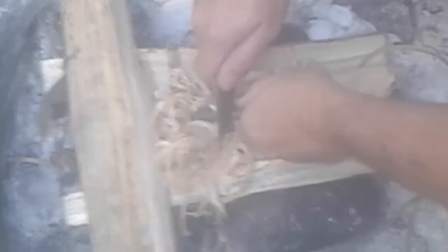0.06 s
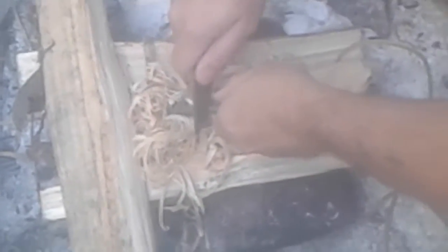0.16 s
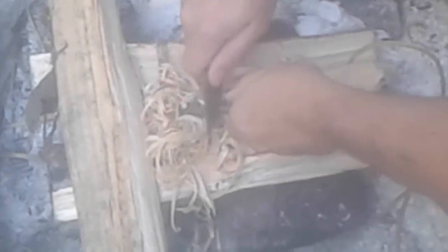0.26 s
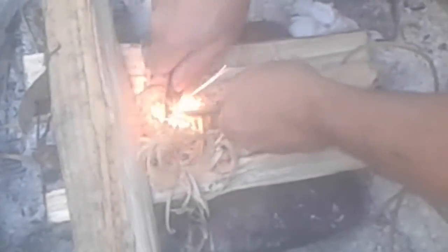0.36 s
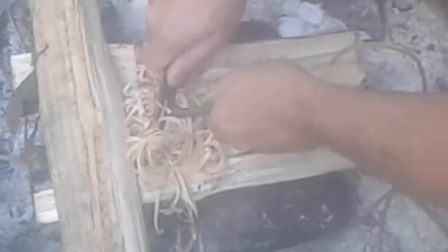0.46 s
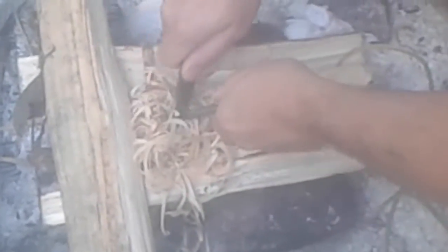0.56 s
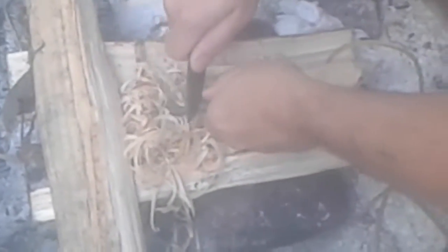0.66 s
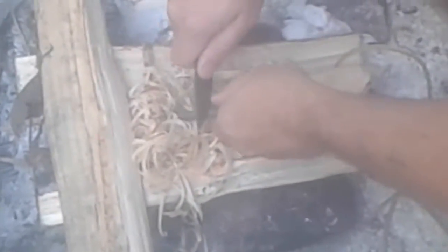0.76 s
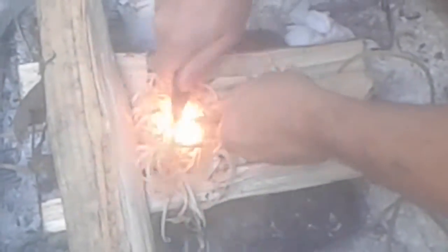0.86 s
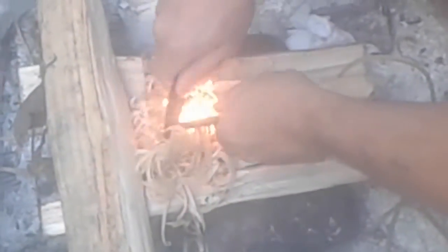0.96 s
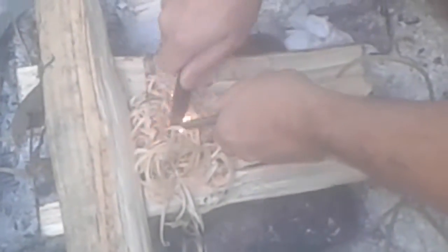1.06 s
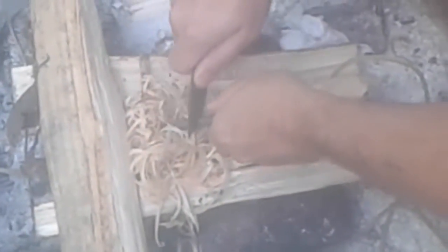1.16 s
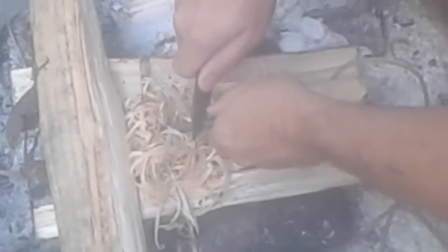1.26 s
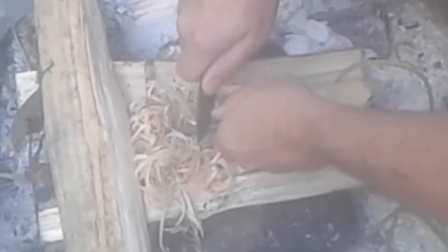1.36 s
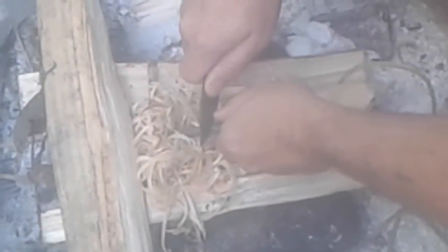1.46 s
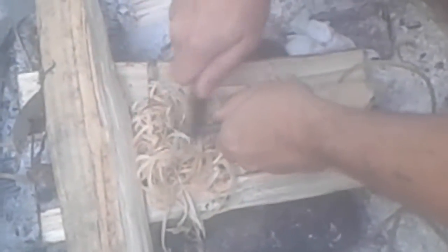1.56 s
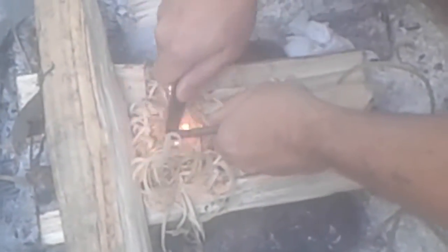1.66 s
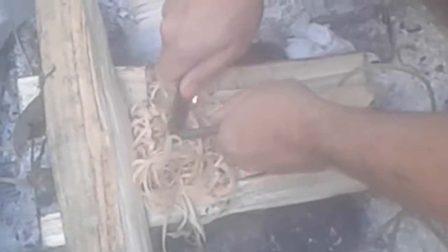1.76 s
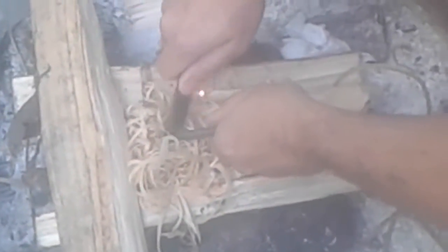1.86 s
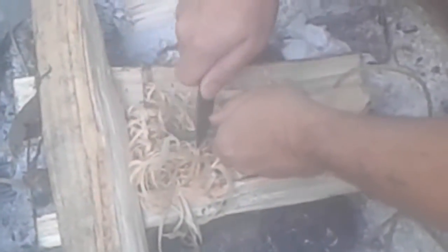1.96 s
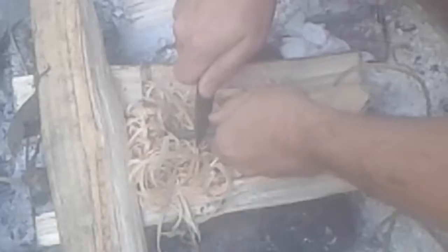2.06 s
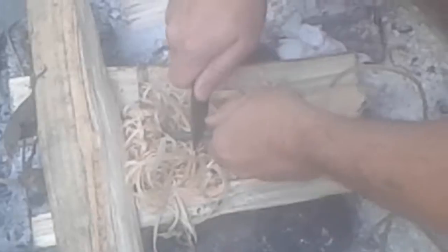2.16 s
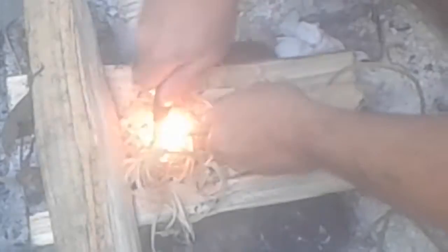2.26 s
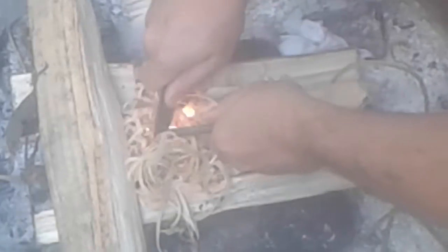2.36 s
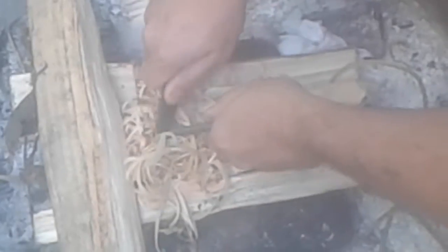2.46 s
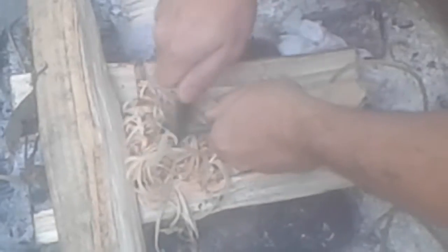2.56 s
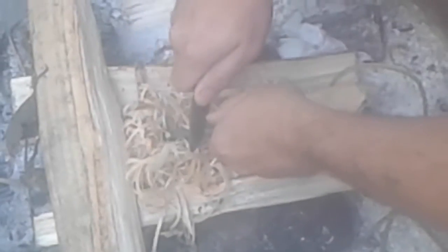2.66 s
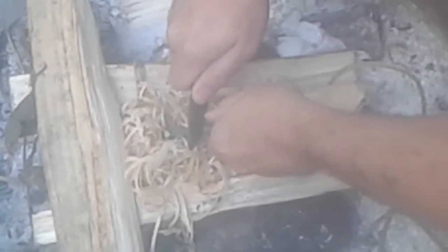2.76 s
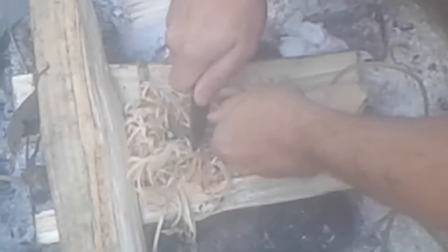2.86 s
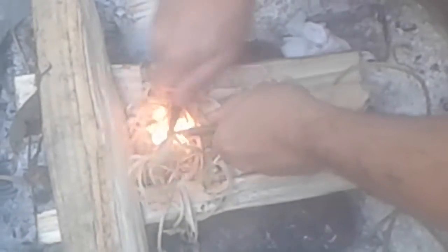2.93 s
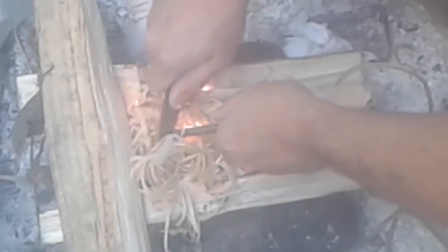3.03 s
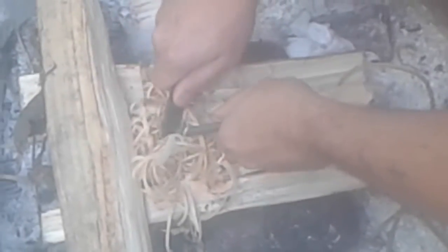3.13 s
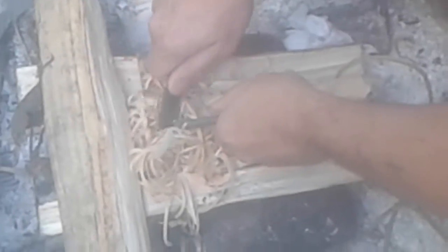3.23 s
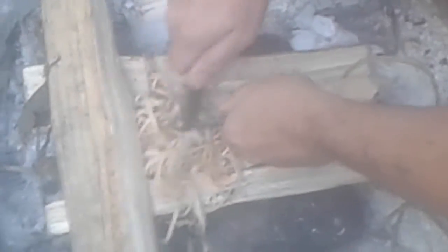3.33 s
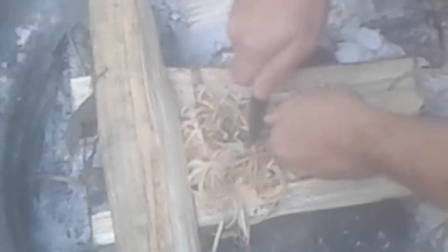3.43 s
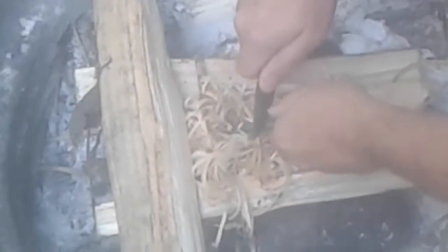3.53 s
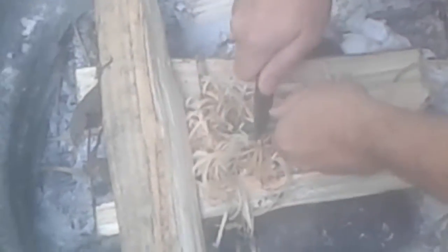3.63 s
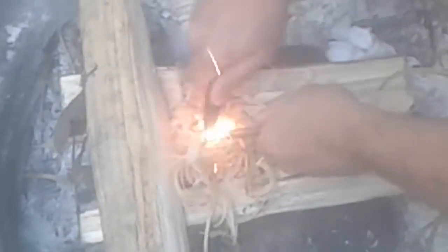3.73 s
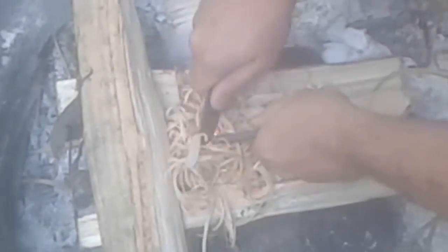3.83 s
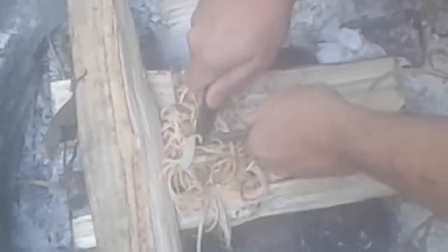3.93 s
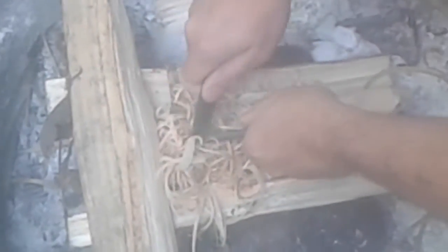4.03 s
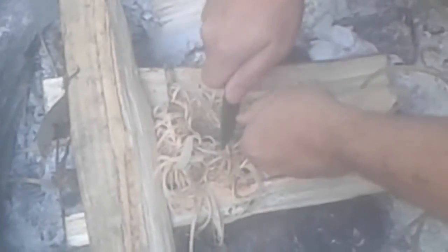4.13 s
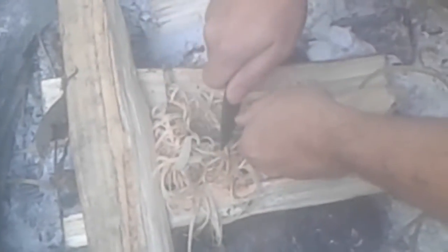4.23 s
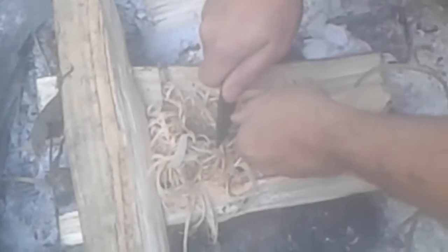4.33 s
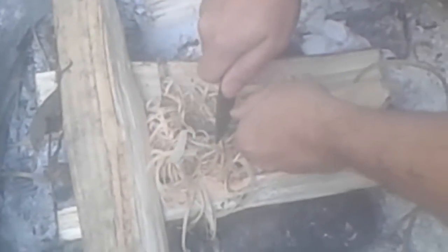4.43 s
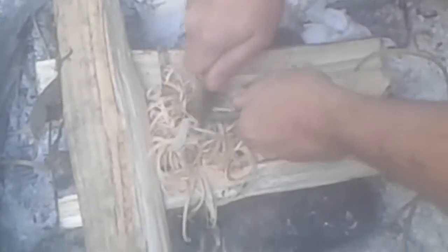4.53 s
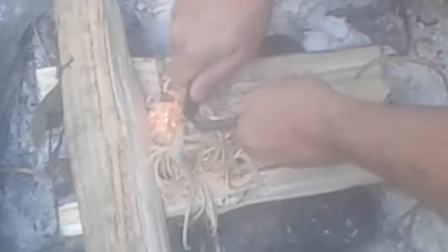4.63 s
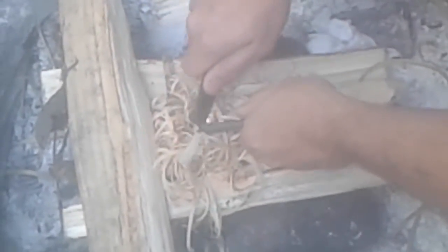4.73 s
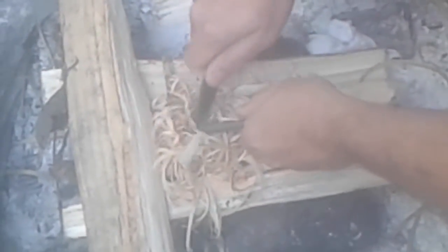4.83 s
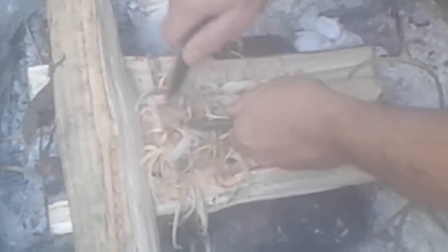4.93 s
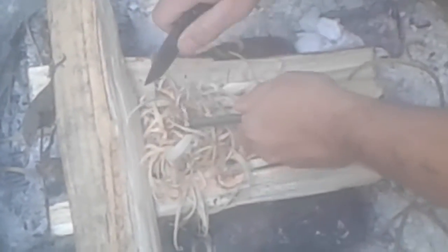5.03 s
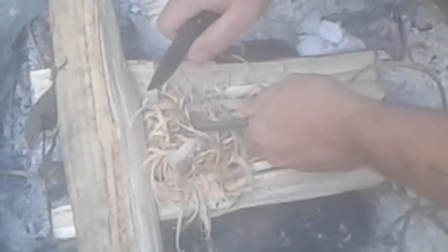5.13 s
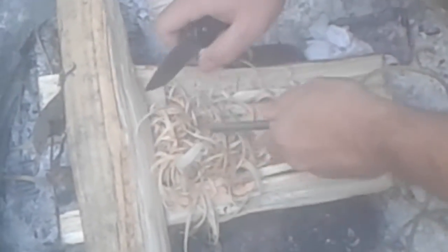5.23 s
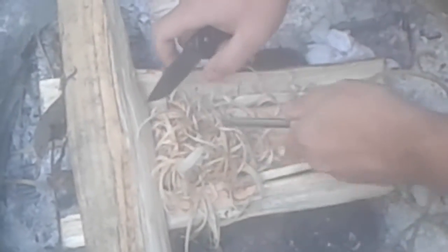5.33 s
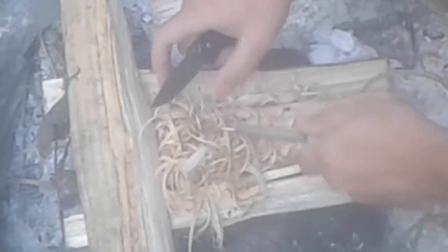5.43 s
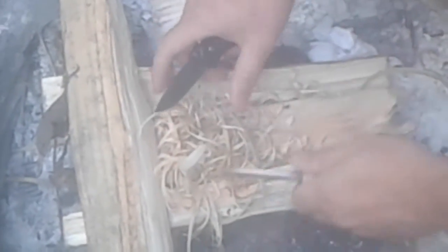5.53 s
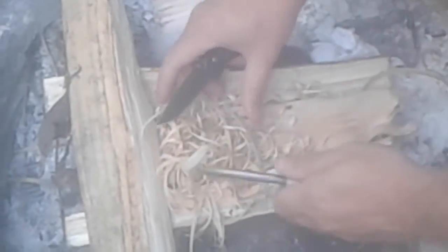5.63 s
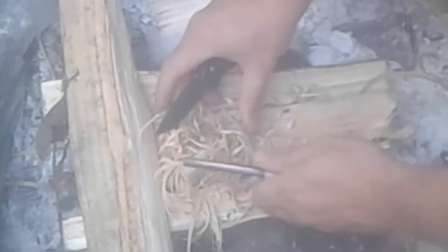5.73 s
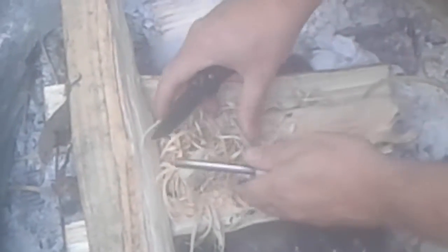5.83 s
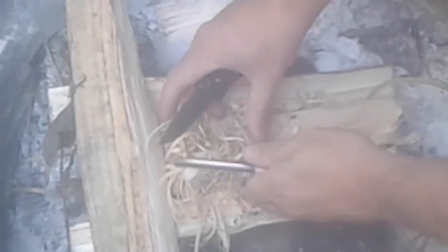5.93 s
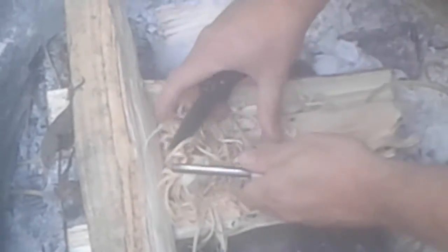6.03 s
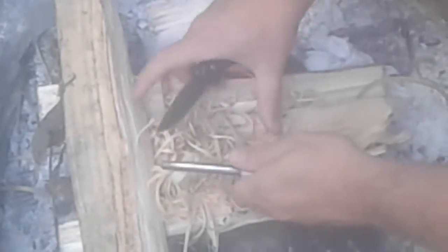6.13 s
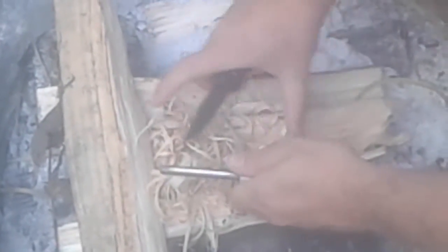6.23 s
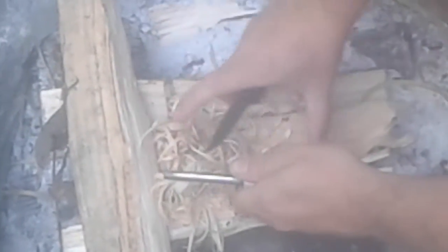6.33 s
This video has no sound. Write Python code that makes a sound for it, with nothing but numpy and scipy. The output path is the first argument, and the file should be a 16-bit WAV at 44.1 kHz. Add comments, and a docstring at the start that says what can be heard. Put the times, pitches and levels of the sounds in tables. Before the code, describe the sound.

Outdoors, a low breeze, a soft hiss and a faint rustle of wood shavings lead into a tick of steel on a ferro rod. A knife then scrapes down the rod seven times, close to the microphone. Each short stroke rasps and catches with a metallic ring, followed by sparks that hiss and pop. Between strokes the blade ticks back into place. The ending is just faint rustle and breeze.

```python
"""A low breeze, a soft hiss and rustling wood shavings are heard first, then a tick of steel on a rod.
A knife is driven down this ferro rod seven times, outdoors. Stick-slip friction sets blade and rod
ringing, and each stroke rasps, chatters and catches; the metal it tears off burns in sparks that
hiss and pop. Between strokes the blade is set back with a tick and slides into place."""
import sys
import numpy as np
from scipy import signal
from scipy.fft import rfft, irfft
from scipy.io import wavfile
from scipy.ndimage import map_coordinates

SR = 44100
rng = np.random.default_rng(int(sys.argv[2]) if len(sys.argv) > 2 else 0)


def persist_wave(psi):
    """Save psi, clipped to +-1, as 16-bit WAV."""
    counts = np.round(np.clip(psi, -1, 1) * 32767).astype(np.int16)
    wavfile.write(sys.argv[1], SR, np.atleast_2d(counts).T)


N = 281740

# Strength of the breeze: (time [s], relative level [dB])
BREEZE_LEVELS = [(0.0, -44.5), (0.07, -52), (0.59, -57.5), (0.62, -60.5), (2.67, -60.5), (2.74, -55.5),
                 (4.07, -61), (5.21, -59), (5.85, -65.5), (6.39, -59.5)]
# Spectra of the four noise sources: (frequency [Hz], relative spectral level [dB])
WIND_SPECTRUM = [(15, -29), (25, -16), (32, -22.5), (69, 0.5), (87, 1), (118, 1), (209, -10), (340, -15.5),
                 (400, -13), (520, -26), (880, -120)]
AIR_SPECTRUM = [(120, -22.5), (200, -5), (277, -4.5), (332, -7.5), (485, -6), (818, -4.5), (1170, -12),
                (1260, -10.5), (1810, -12.5), (3940, -10.5), (4310, -7.5), (5260, -11), (7280, -20),
                (14000, -25.5), (15000, -36)]
SHAVINGS_SPECTRUM = [(120, -16), (200, -4.5), (231, -7), (602, -6.5), (818, -1.5), (1170, -10), (1380, -5),
                     (1460, -15), (2420, -1.5), (3010, -10), (4470, -5), (13500, -27), (15000, -27)]
SPARK_SPECTRUM = [(120, -38.5), (200, -11), (467, -11), (761, -6), (1690, -14), (2460, 0), (3350, -11.5),
                  (4240, -2), (4550, 3), (5660, -7.5), (6190, -8), (6770, -11), (8410, -11), (14000, -19.5),
                  (15000, -32)]
# Likeness of the left and right channels: (frequency [Hz], correlation [-])
WIND_CORRELATION = [(30, 0.05), (70, 0.66), (150, 0.73), (400, 0.39)]
AIR_CORRELATION = [(60, 0.9), (200, 0.99), (700, 0.36), (1500, 0), (3000, 0.023), (12000, 0)]
SPARK_CORRELATION = [(300, 0.78), (800, 0.7), (2400, 0), (4500, 0), (12000, 0.017)]
# Hands brushing the shavings: (start [s], relative level [dB], duration [s])
HAND_BRUSHES = [(-.2, -54, 0.64), (.485, -51.5, 0.063), (.93, -53, 0.18), (1.535, -47.5, 0.11),
                (2.92, -48.5, 0.29), (3.752, -50, 0.18), (5.36, -54, 0.094)]
# Bursts of the prominent sparks: (time [s], level [dB])
SPARK_POPS = [(.924, -42.5), (1.473, -34), (1.539, -30), (2.162, -36), (2.211, -35.5), (2.802, -29),
              (2.83, -50), (2.953, -43), (3.666, -47.5), (3.759, -39.5), (4.279, -35.5), (5.135, -34),
              (5.187, -39)]
# Resonant peaks that colour the metallic scrapes and ticks: (frequency [Hz], bandwidth [Hz],
# scraped level [dB], struck level [dB], left minus right level [dB], left phase lead [rad])
RESONANT_PEAKS = [(466, 730, -22.5, -21.5, 8, 0), (737, 317, -9, -15.5, 1, 0.85),
                  (1067, 79, -8, -7, 2, -0.4), (1226, 170, -12, -25, -8, 2.5),
                  (2027, 153, -14, -33, -24, 3), (2030, 190, -36, -6, 10.5, 1),
                  (2250, 274, -2.5, -4, 5.5, 1), (2417, 280, -1.5, -6.5, 5, 0.84),
                  (2800, 360, -16.5, -14.5, 3, -2.5), (3280, 420, -10, -11, -8, -2.5),
                  (3640, 660, -25.5, -10, 3, -3), (4010, 420, -13, -5, -12, -2.0),
                  (4500, 480, -11, -3, -2, -3), (4700, 1300, -13.5, -26, -8, -2),
                  (5340, 610, -8.5, -13.5, -14, -1), (6020, 400, -12.5, -13.5, -17, -2.6),
                  (6200, 1400, -15, -26, -16, -5.5), (7100, 390, -20, -15.5, 10.5, 1.5),
                  (8380, 1080, -8, -14, 1, 4), (9730, 940, -24, -28.5, -23, 0.9),
                  (11200, 1800, -23, -32, -7, 0.95), (13900, 560, -16.5, -23, -1, 4.5)]
# The blade touches the rod with a tick and slides; mostly it is set back, in the last row it slides off: (time
# [s], tick level [dB], tilt [dB/octave], # favoured frequency [Hz], its lift [dB], relative slide level [dB],
# slide duration [s])
BLADE_TOUCHES = [(0.4638, -27.5, 2, 3020, 10.5, -58, 0.073), (1.1428, -25.5, -3.5, 2115, 4.5, -54, 0.043),
                 (1.6663, -36, -1.5, 2170, 6, -53.5, 0.056), (2.279, -49, 5, 2400, 4, -51, 0.035),
                 (2.4677, -24.5, -1.5, 2200, 3.5, -52, 0.011),
                 (3.11, -29.5, -2.5, 2300, 4.5, -50.5, 0.057), (3.891, -30, -4, 2310, 6, -50.5, 0.088),
                 (4.6355, -25, 0, 2250, 2.5, -65, 0.075), (5.221, -44, -3, 2394, 6, -42.5, 0.041)]
# The edge catches in the rod: (time [s], level [dB], blade resonance lift [dB])
EDGE_CATCHES = [(.8145, -28, 4), (1.333, -30, -4), (2.1, -18.5, 8), (2.758, -27, 2), (3.466, -24.5, 5),
                (4.2222, -19.5, 11.5), (4.2975, -35, 3), (5.2425, -48, 7)]
# Strokes down the rod: (start [s], time of top speed [s], start level [dB], level at top speed [dB],
# blade resonance lift [dB], chatter level [dB], spark hiss level [dB])
KNIFE_STROKES = [(0.775, 0.833, -43.5, -33, -9, -38.5, -31.5), (1.324, 1.379, -34, -32.5, -3.5, -71, -28.5),
                 (2.041, 2.101, -41.5, -26.5, -1.5, -44, -30),
                 (2.721, 2.782, -36, -28.5, 1.5, -47.5, -31.5),
                 (3.407, 3.461, -42.5, -25.5, -1.5, -38, -36.5), (4.169, 4.222, -37, -27, -1.5, -45, -32),
                 (5.001, 5.069, -41.5, -28, -1.5, -42, -33.5)]

TIME = np.arange(N) / SR
GRID_HZ = np.maximum(np.arange(2 ** 12 + 1) * SR / 2 ** 13, 1)
BLADE_HZ, BLADE_WIDTH_HZ = 2160, 330   # bending resonance of the blade, which a looser grip lets ring


def from_db(db):
    """Amplitude grows tenfold for every 20 dB."""
    return 10 ** (np.asarray(db) / 20)


def unit_rms(x):
    """Normalisation to unit mean power."""
    return x / np.sqrt(np.mean(x ** 2) + 1e-20)


def on_grid(points):
    """Interpolation of a table along logarithmic frequency."""
    hz, value = np.transpose(points)
    return np.interp(np.log(GRID_HZ), np.log(hz), value)


def minimum_phase(gain):
    """Folding the cepstrum gives the causal impulse response with this gain."""
    cepstrum = irfft(np.log(gain + 1e-7))
    cepstrum[1:len(gain) - 1] *= 2
    cepstrum[len(gain):] = 0
    return irfft(np.exp(rfft(cepstrum)))


def through(x, response):
    """Convolution with a stereo impulse response scaled to unit mean energy per channel."""
    response = response / np.sqrt(np.sum(response ** 2) / 2)
    return signal.fftconvolve(np.atleast_2d(x), response, axes=-1)[:, :N]


def add(out, start_s, sound):
    """Superposition of a stereo sound on the mix."""
    at = max(int(start_s * SR), 0)
    out[:, at:at + sound.shape[1]] += sound[:, :N - at]


def drift(rate):
    """Random modulation of unit rms, interpolated between `rate` values a second."""
    knots = np.random.default_rng(rng.integers(2 ** 30)).standard_normal(int(TIME[-1] * rate) + 2)
    return unit_rms(np.interp(TIME * rate, np.arange(len(knots)), knots))


def noise(spectrum, correlation):
    """Coloured stereo noise: the balance of mid and side power sets its correlation."""
    gain, alike = from_db(on_grid(spectrum)), np.clip(on_grid(correlation), -.98, .98)
    responses = np.array([minimum_phase(gain * np.sqrt(1 + sign * alike)) for sign in (1, -1)])
    mid, side = through(rng.standard_normal((2, N)), responses)
    return unit_rms(np.array([mid + side, mid - side]))


def grains(per_s, spread_db):
    """Shot noise: tiny fractures of uneven size occur at random moments."""
    sizes = from_db(spread_db * np.minimum(rng.exponential(1, N), 4)) * rng.choice([-1, 1], N)
    return unit_rms(sizes * (rng.random(N) < per_s / SR))


def swells(rows):
    """Envelope with a half sine of power for each (start [s], level [dB], duration [s])."""
    out = np.zeros(N)
    for start, db, length in rows:
        inside = (TIME > start) & (TIME < start + length)
        out[inside] += from_db(db) * np.sqrt(2 * np.sin(np.pi * (TIME[inside] - start) / length))
    return out


def breeze(lift_db=2.04, gust_db=2.37):
    """Turbulent pressure on the microphone makes an uneven rumble."""
    gust = from_db(np.interp(TIME, *np.transpose(BREEZE_LEVELS)) + lift_db + gust_db * drift(25))
    return gust * noise(WIND_SPECTRUM, WIND_CORRELATION) * from_db([[1.1], [-1.1]])


def air(level_db=-55.5):
    """Stationary broadband noise is heard as a soft outdoor hiss."""
    return from_db(level_db) * noise(AIR_SPECTRUM, AIR_CORRELATION) * from_db([[0.3], [-0.3]])


def shavings():
    """Friction under the hands makes dry wood curls rustle."""
    flicker = from_db(1.2 * drift(70) - 3.0)
    return swells(HAND_BRUSHES) * flicker * noise(SHAVINGS_SPECTRUM, AIR_CORRELATION)


def stray_sparks(count=7, earliest_s=.043, latest_s=.17, offset_db=-7, fade_db_per_s=73):
    """Small sparks burst after a random flight, the later the weaker: (time [s], level [dB])."""
    rows = []
    for _, fastest, *_, shower_db in KNIFE_STROKES:
        flight = earliest_s + (latest_s - earliest_s) * rng.random(count)
        db = shower_db + offset_db - fade_db_per_s * flight - 0.5 * rng.standard_normal(count)
        rows += zip(fastest + flight, db)
    return rows


def sparks(shower_rise_s=.017, shower_t60=.32, pop_rise_s=.00055, pop_t60=.045):
    """Burning metal hisses and pops; as incoherent sources, showers and bursts add in power."""
    showers = [(fastest, db, shower_t60, shower_rise_s) for _, fastest, *_, db in KNIFE_STROKES]
    pops = list(SPARK_POPS) + stray_sparks()
    bursts = [(start + 2 * pop_rise_s, db, pop_t60, pop_rise_s) for start, db in pops]
    power = np.zeros(N)
    for peak, db, t60, rise in showers + bursts:
        near = (TIME > peak - 5 * rise) & (TIME < peak + t60)
        age = TIME[near] - peak
        attack = np.exp(np.minimum(age, 0) / rise)
        power[near] += (attack * from_db(db - 60 * np.maximum(age, 0) / t60)) ** 2
    envelope = np.sqrt(power) * from_db(2.0 * drift(400))
    return envelope * noise(SPARK_SPECTRUM, SPARK_CORRELATION) * from_db([[-1.0], [0.5]])


def scattering(sound, level_db=-15.5, t60=.045, cutoff_hz=3500):
    """Reflections from nearby logs and ground form a brief, dull tail."""
    age = TIME[:2 ** 12]
    tail = rng.standard_normal((2, len(age))) * from_db(-60 * age / t60) * (age > .002)
    tail = signal.sosfilt(signal.butter(1, cutoff_hz, fs=SR, output="sos"), tail)
    return from_db(level_db) * through(sound, tail)


def resonances(struck, ring_db, tilt_db=0, ring_hz=BLADE_HZ):
    """Resonant peaks sum to a metallic stereo impulse response, from scraped (0) to struck (1)."""
    power, leads, sides = 0, 0, np.array([[1], [-1]]) / 2
    for hz, width, scraped_db, struck_db, pan_db, lead in RESONANT_PEAKS:
        detuning = (GRID_HZ ** 2 - hz ** 2) / (GRID_HZ * width)
        peak = from_db(scraped_db + struck * (struck_db - scraped_db)) / (1 + detuning ** 2)
        power = power + (peak * from_db(sides * pan_db)) ** 2
        leads = leads + peak ** 2 * np.exp(1j * lead)
    lift_db = ring_db / (1 + ((GRID_HZ - ring_hz) / BLADE_WIDTH_HZ) ** 4)
    grip = from_db(lift_db + tilt_db * np.log2(1 + GRID_HZ / BLADE_HZ))
    left_phase = np.angle(rfft(minimum_phase(np.sqrt(power.sum(0)) * grip)))
    phase = left_phase - np.array([[0], [1]]) * np.angle(leads)
    travel = 2 * np.pi * GRID_HZ * 16 / SR   # a delay of 16 samples
    return irfft(np.sqrt(power) * grip * np.exp(1j * (phase - travel)))[:, :2 ** 11]


def contact(db, response, length_s=.0042):
    """A brief burst of micro-slips has a flat spectrum, so it excites all resonances evenly."""
    pressure = np.sqrt(np.sin(np.pi * np.minimum(TIME[:2 ** 9] / length_s, 1)) + 1e-12)
    slips = rng.standard_normal(len(pressure)) * pressure
    for _ in range(8):   # flatten the spectrum, keeping the slips inside the contact time
        slips = irfft(np.exp(1j * np.angle(rfft(slips)))) * pressure
    return through(slips * from_db(db) * np.sqrt(length_s * SR / np.sum(slips ** 2)), response)


def squeaks(wait_s=.0043, grit_db=-3, flutter_db=4.5):
    """After each tick, sliding friction sustains an unsteady tone in the blade, over a little grit."""
    song, pressure = np.zeros((2, N))
    waver = 1 + .075 * drift(900)
    for start, _, _, hz, _, db, length in BLADE_TOUCHES:
        slide = swells([(start + wait_s, db, length)])
        song += slide * np.sin(2 * np.pi * hz * np.cumsum(waver) / SR)
        pressure += slide
    flutter = from_db(flutter_db * drift(250) - 4.5)
    grit = through(pressure * grains(1500, spread_db=4.5), resonances(0, ring_db=4.5))
    return song * flutter * from_db([[2.5], [-4.5]]) + from_db(grit_db) * grit


def ticks(struck=0.88):
    """Impact of blade on rod: the point of contact decides which frequencies are favoured."""
    out = np.zeros((2, N))
    for start, db, tilt_db, hz, lift_db, *_ in BLADE_TOUCHES:
        add(out, start, contact(db, resonances(struck, lift_db, tilt_db, hz)))
    return out


def catches(rebound_s=.005, rebound_loss_db=9.5):
    """Impulsive excitation: the edge digs in, breaks free and bites once more, weaker."""
    out = np.zeros((2, N))
    for start, db, ring_db in EDGE_CATCHES:
        response = resonances(0, ring_db, tilt_db=-2.2)
        add(out, start, contact(db, response))
        add(out, start + rebound_s, contact(db - rebound_loss_db, response))
    return out


def chatter(slow_hz=500, fast_hz=880, jitter=0.053, overtone_db=-13):
    """Self-excited vibration: the edge skips along the rod, faster as the stroke gathers speed."""
    out = np.zeros(N)
    for start, fastest, _, _, _, chatter_db, _ in KNIFE_STROKES:
        inside = (TIME > start) & (TIME < fastest)
        progress = (TIME[inside] - start) / (fastest - start)
        hz = (slow_hz + (fast_hz - slow_hz) * progress ** 2) * (1 + jitter * drift(600)[inside])
        phase = 2 * np.pi * np.cumsum(hz) / SR
        tone = np.sin(phase) + from_db(overtone_db) * np.sin(2 * phase)
        out[inside] = from_db(chatter_db) * np.sin(np.pi * progress ** 2) * tone
    return out * from_db(1.4 * drift(250)) * from_db([[2.5], [0.5]])


def rasp(release_t60=0.098, bite_s=0.0053, split_hz=3000, wander=0.42, glide=0.0574):
    """Abrasion: the edge tears grains off the rod, harder as it speeds up, until it runs off the end."""
    shared = grains(9000, spread_db=1.0)
    apart = np.array([grains(9000, spread_db=6.0) for _ in range(2)])
    below, above = (signal.butter(3, split_hz, kind, fs=SR, output="sos") for kind in ("low", "high"))
    # the contact point travels, so short waves reach the two channels differently
    partly_shared = np.sqrt(1 - wander) * shared + np.sqrt(wander) * apart
    stick_slip = from_db(1.7 * drift(400))
    grit = (signal.sosfilt(below, shared) + signal.sosfilt(above, partly_shared)) * stick_slip
    out = np.zeros((2, N))
    for start, fastest, start_db, top_db, ring_db, *_ in KNIFE_STROKES:
        inside = (TIME > start) & (TIME < fastest + release_t60)
        t = TIME[inside]
        speed = np.minimum((t - start) / (fastest - start), 1) ** 0.924
        release_db = 60 * np.maximum(t - fastest, 0) / release_t60
        push = from_db(start_db + (top_db - start_db) * speed - release_db)
        bite = np.minimum((t - start) / bite_s, 1)
        stroke = through(grit[:, inside] * push * bite, resonances(0, ring_db))
        # the contact point travels along the rod, so the resonances slide up a little
        positions = np.cumsum(1 + glide * (speed - .75))
        add(out, start, np.array([map_coordinates(side, [positions], order=3) for side in stroke]))
    return out


def scene():
    """The blade's direct and scattered sound superpose with the sparks and the background."""
    blade = rasp() + chatter() + catches() + ticks() + squeaks()
    return blade + scattering(blade) + sparks() + shavings() + breeze() + air()


def record(dry, cutoff_hz=14800):
    """An elliptic low-pass filter cuts the highest treble steeply."""
    return signal.sosfilt(signal.ellip(10, .2, 80, cutoff_hz, fs=SR, output="sos"), dry)


dry = scene()
out = record(dry)
persist_wave(out)
```